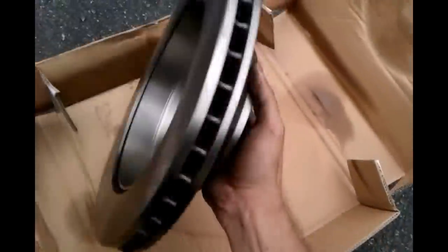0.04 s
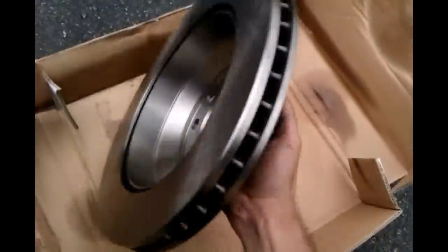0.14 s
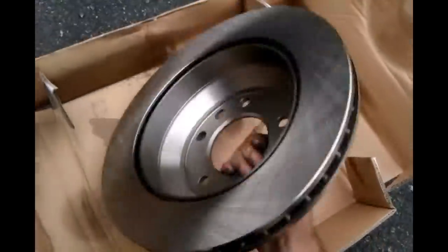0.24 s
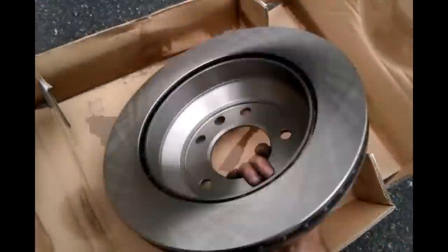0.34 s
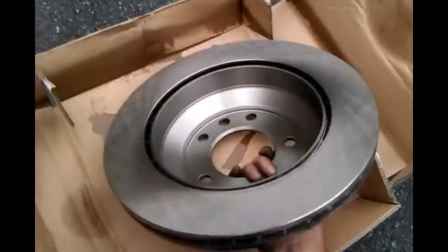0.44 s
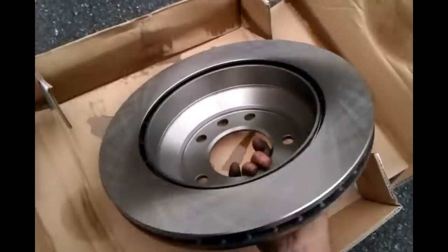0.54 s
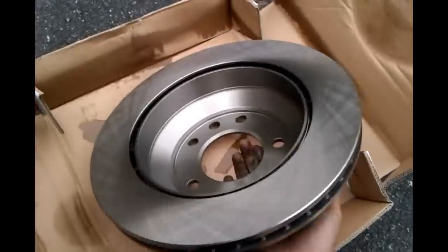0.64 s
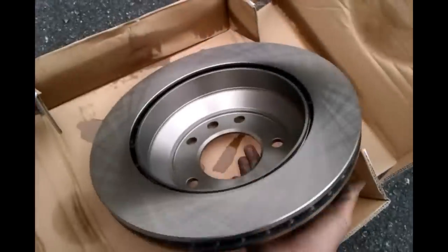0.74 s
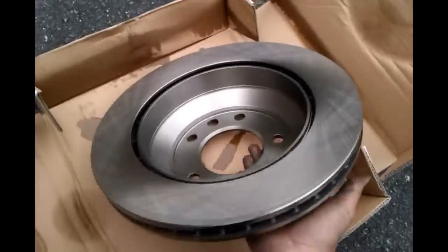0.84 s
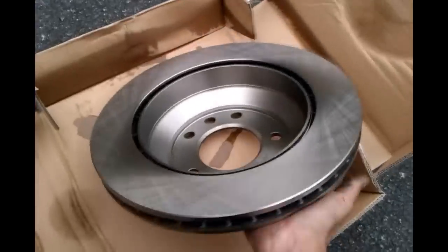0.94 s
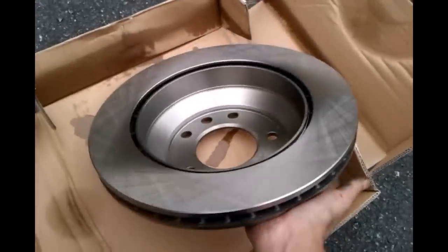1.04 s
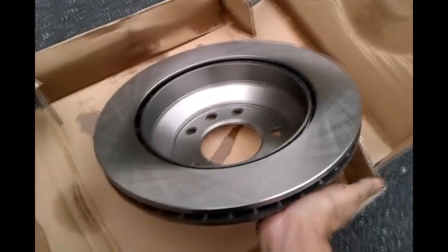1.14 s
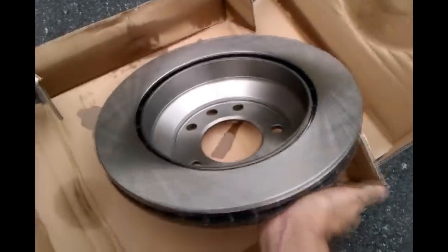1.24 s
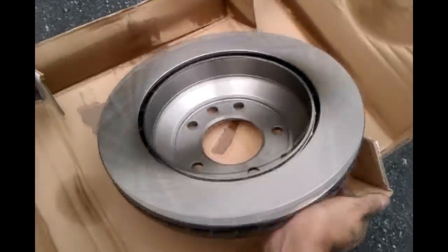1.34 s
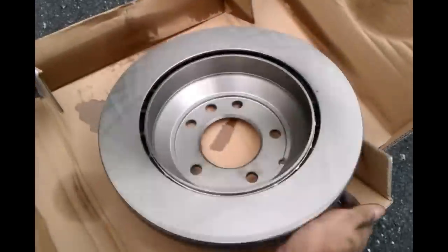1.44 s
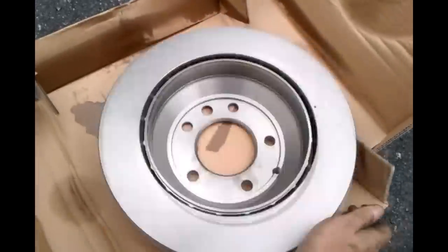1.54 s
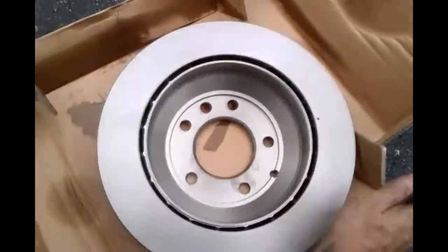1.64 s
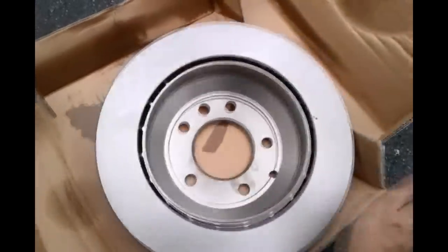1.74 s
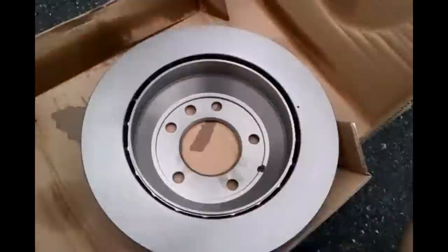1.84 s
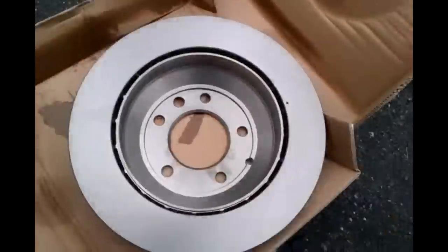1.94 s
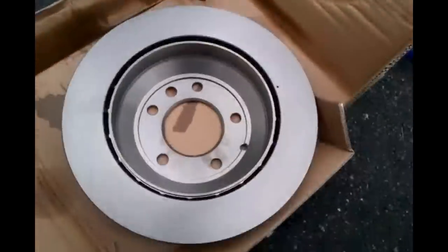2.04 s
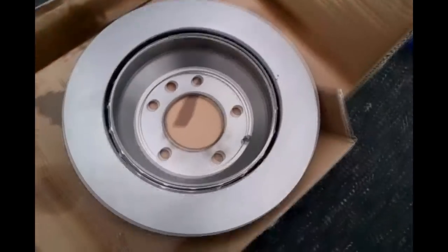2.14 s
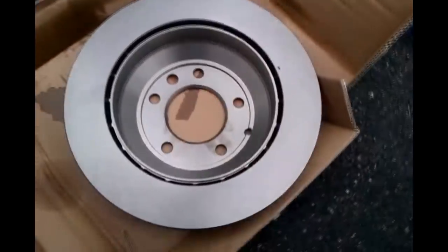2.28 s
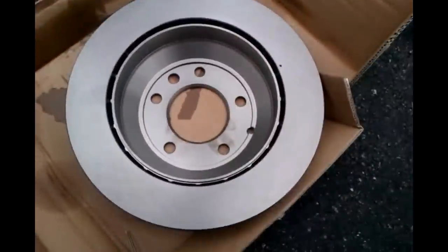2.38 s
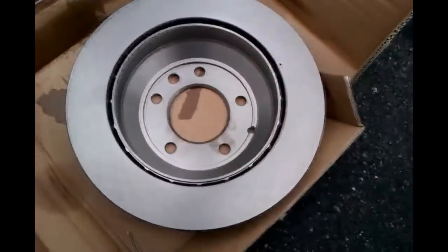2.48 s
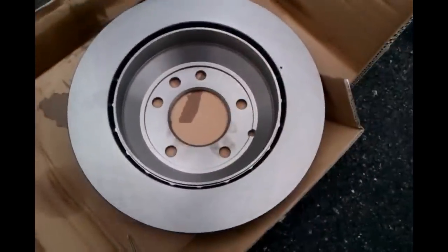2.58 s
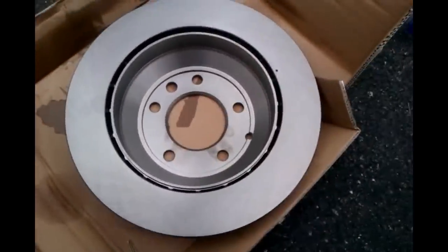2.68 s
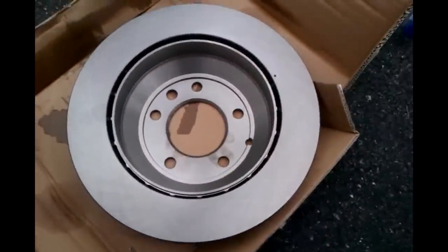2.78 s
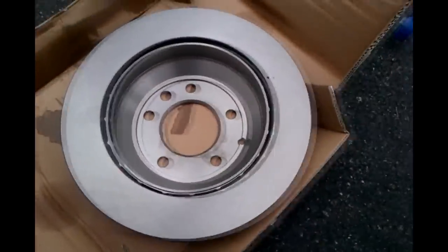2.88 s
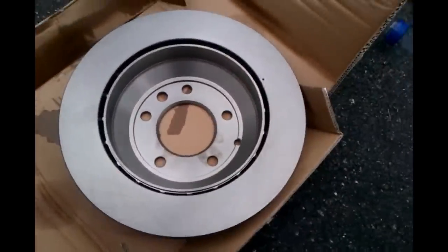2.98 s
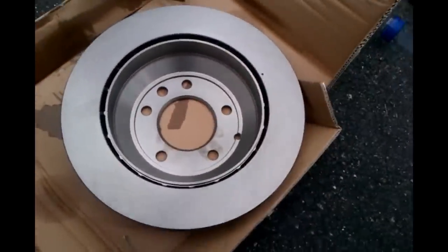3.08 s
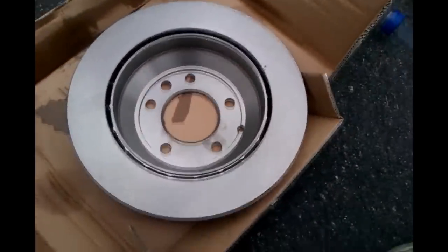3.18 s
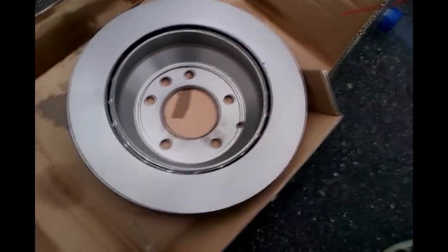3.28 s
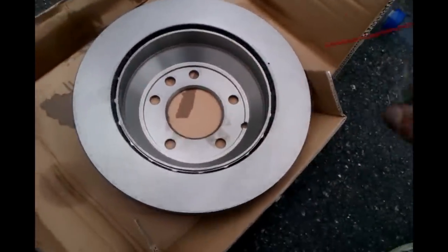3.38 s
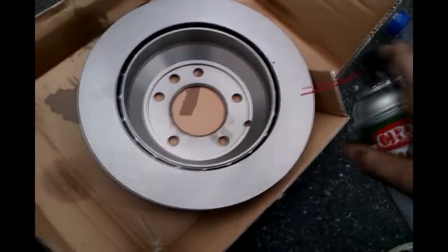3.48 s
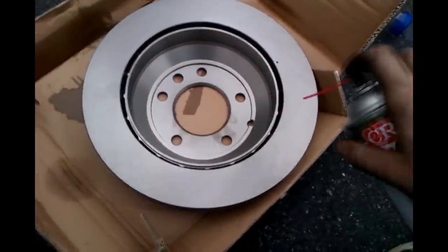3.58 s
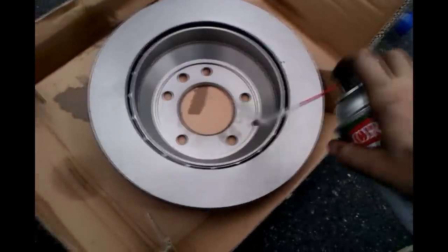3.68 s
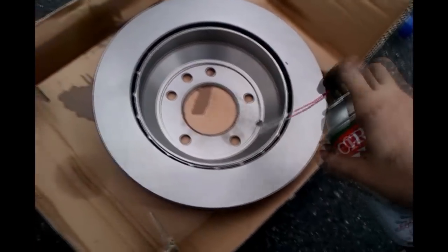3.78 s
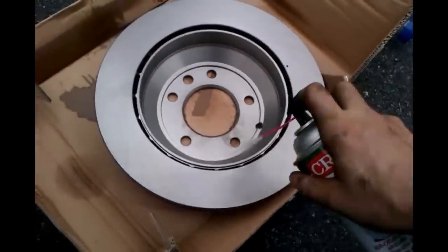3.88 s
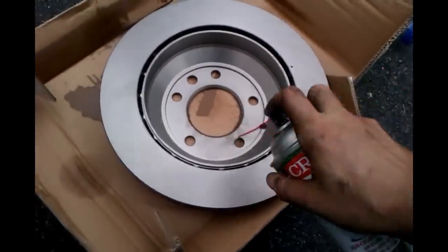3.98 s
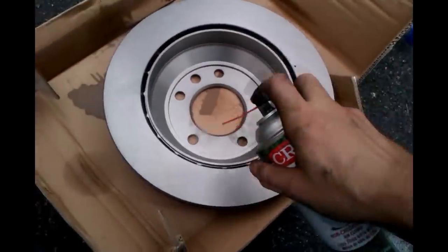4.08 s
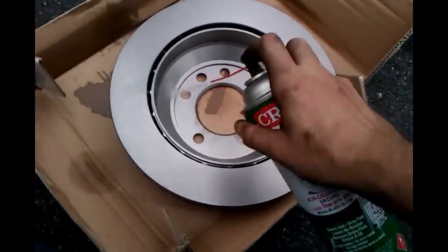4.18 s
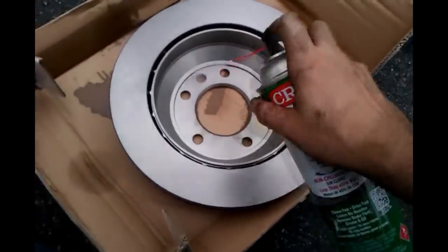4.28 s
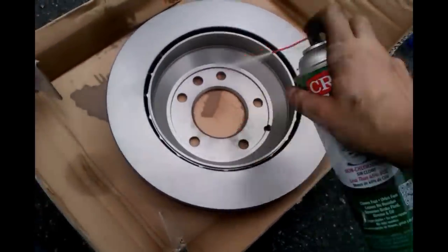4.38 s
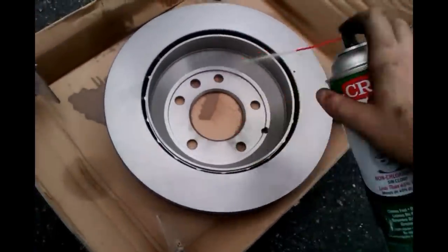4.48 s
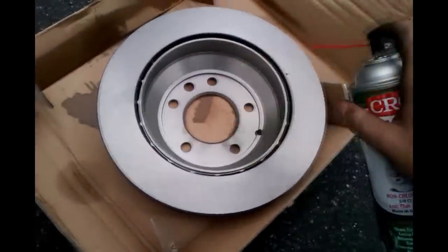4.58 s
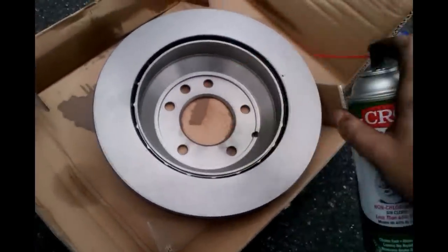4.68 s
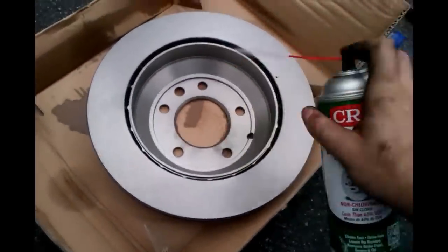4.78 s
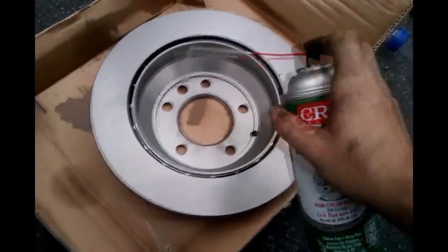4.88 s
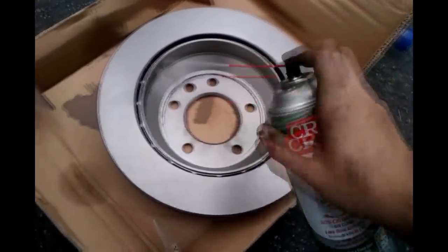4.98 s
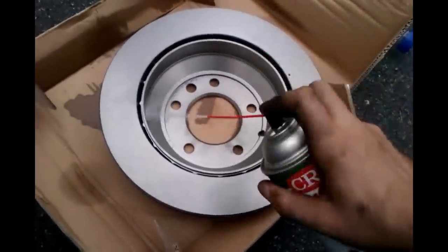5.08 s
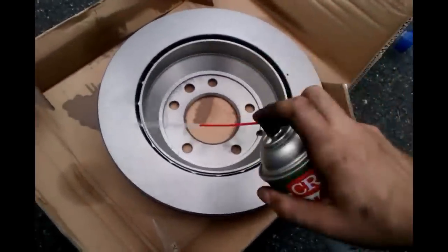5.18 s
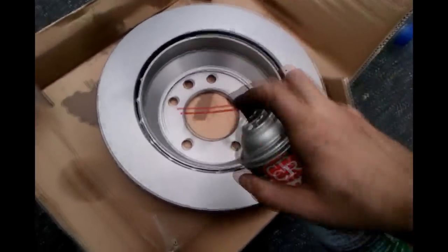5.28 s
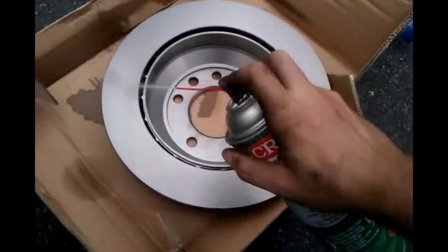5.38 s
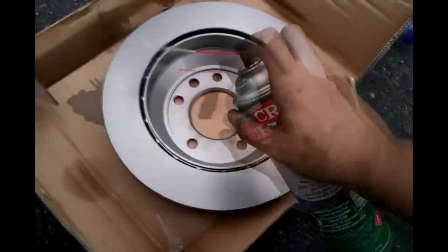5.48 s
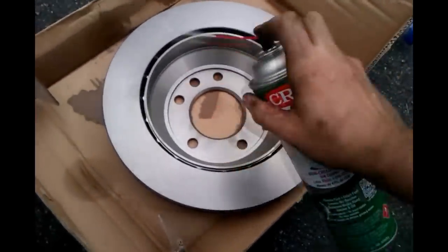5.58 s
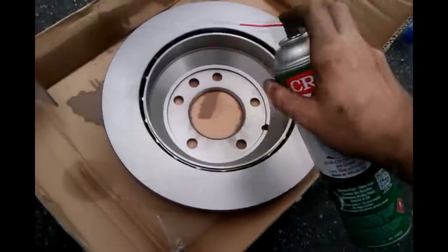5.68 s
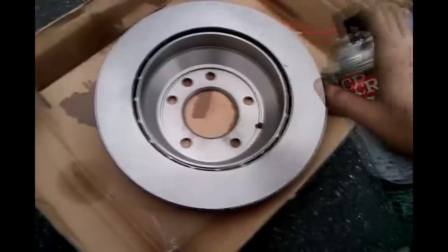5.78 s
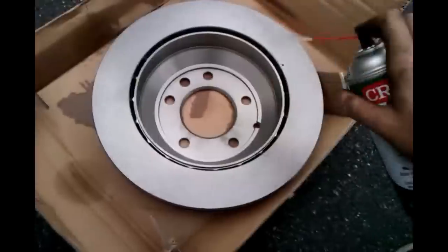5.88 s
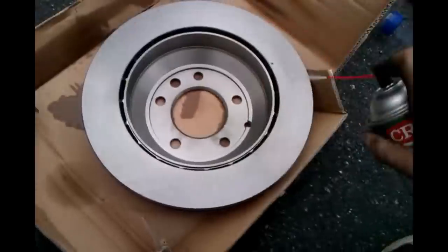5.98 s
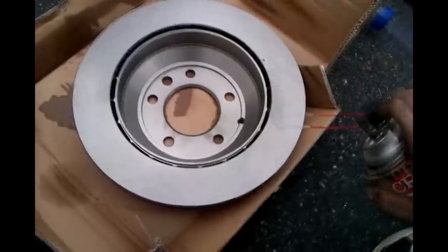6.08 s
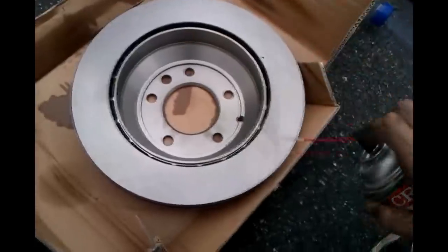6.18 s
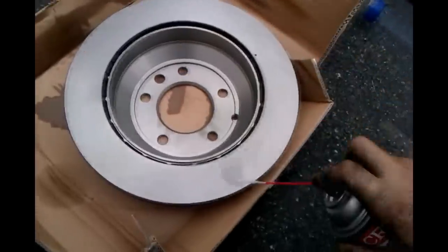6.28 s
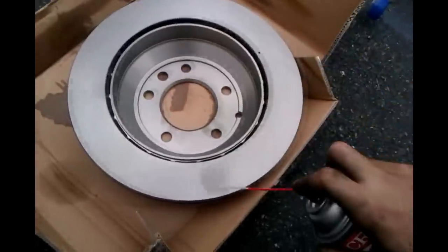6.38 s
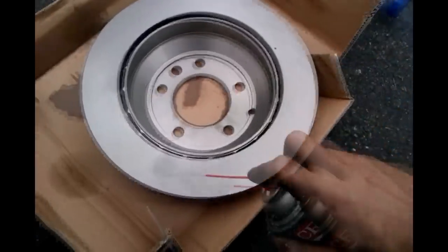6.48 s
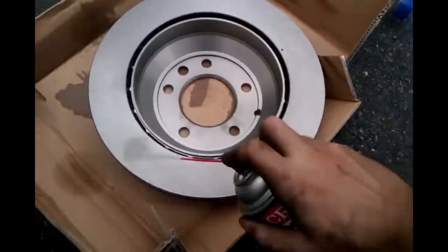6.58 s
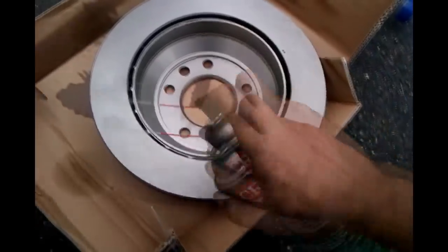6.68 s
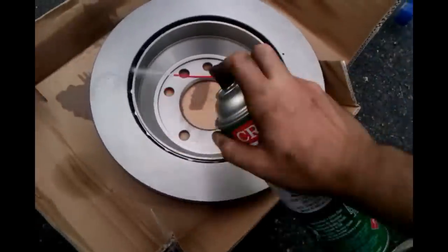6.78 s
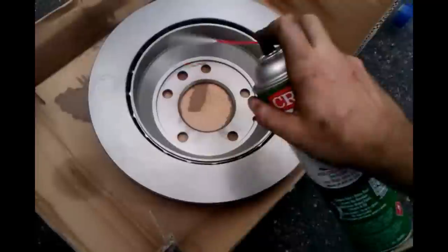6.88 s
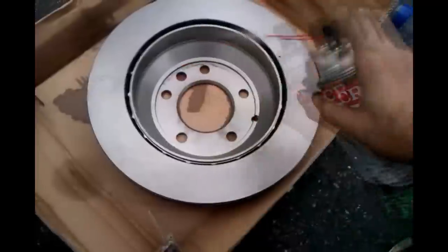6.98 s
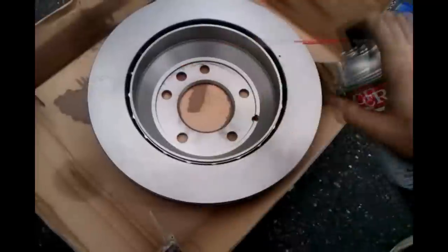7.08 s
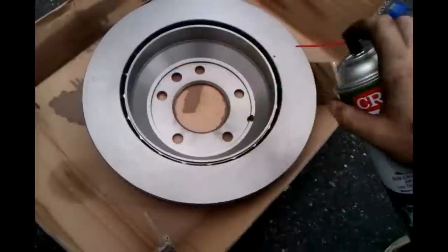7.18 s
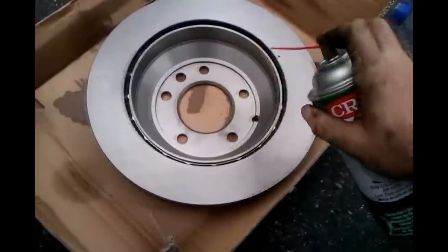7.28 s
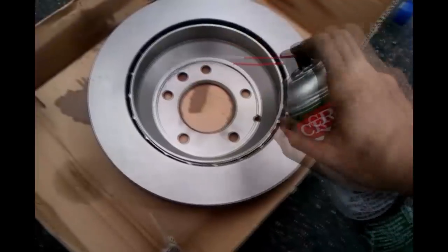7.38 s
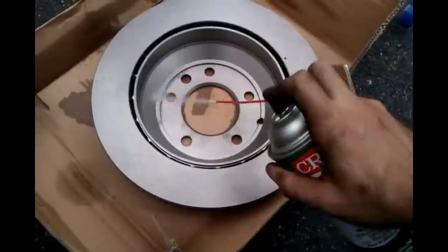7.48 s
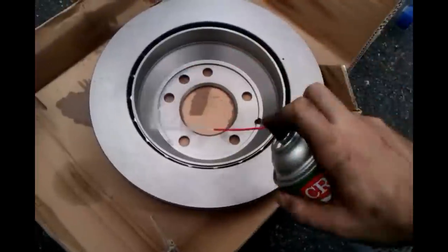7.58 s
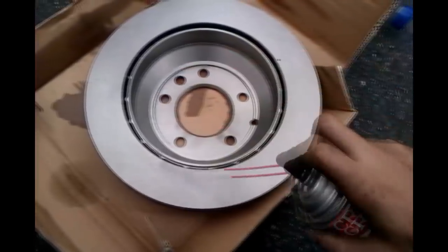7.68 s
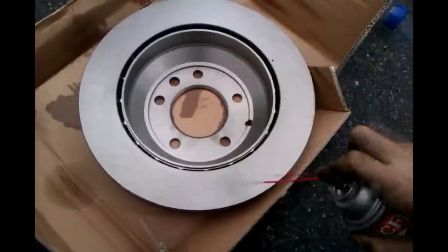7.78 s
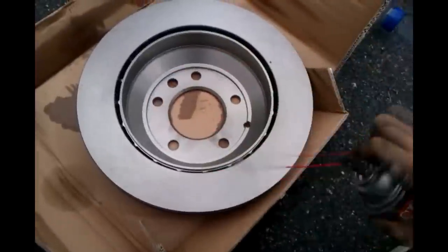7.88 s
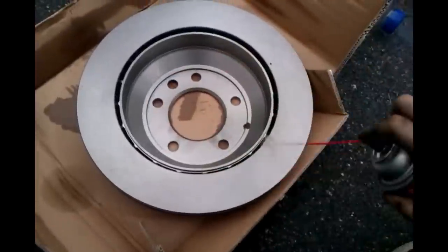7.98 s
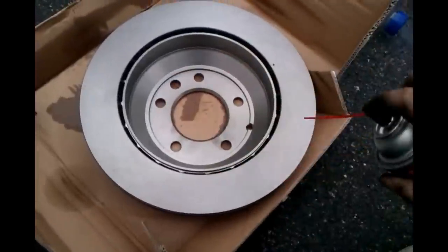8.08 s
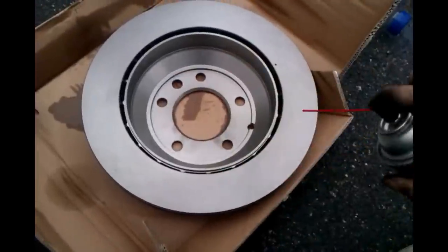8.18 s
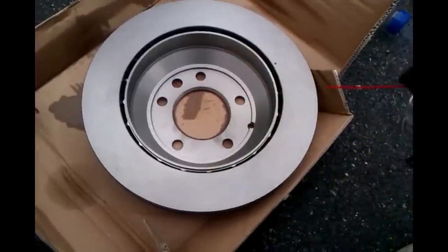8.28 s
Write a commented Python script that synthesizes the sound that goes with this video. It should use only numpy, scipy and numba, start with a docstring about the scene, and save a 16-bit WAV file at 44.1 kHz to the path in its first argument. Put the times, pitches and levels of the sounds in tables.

```python
"""An aerosol can sprays an iron brake disc through a straw in long bursts: droplet clicks, coloured and ringing,
roar in the hollow hub, edge rush and hiss, levels set per stretch as the jet passes over rim, face and hub.
Before that the disc is tipped over and settles, rocking, in a cardboard box: noise bursts, ringing modes, rasps.
Behind: a cricket of arched whistles, far traffic of filtered noise, an engine and a hum of sines.
One microphone outdoors, overloading on the hardest knocks."""
import sys
import numpy as np
from scipy import signal
from scipy.fft import rfft, irfft
from scipy.io import wavfile
from scipy.ndimage import uniform_filter1d
from numba import njit

SR = 44100
rng = np.random.default_rng(int(sys.argv[2]) if len(sys.argv) > 2 else 0)


def digitize_waveform(pressure):
    """Quantize a signal to 16-bit integers and store it at the path in sys.argv[1].

    Rows of a 2-D input are taken as channels; values are limited to [-1, 1].
    """
    field = np.atleast_2d(pressure).T
    bounded = np.clip(field, -1, 1)
    quanta = np.round(bounded * 32767).astype(np.int16)
    wavfile.write(sys.argv[1], SR, quanta)


N = 367794


def from_db(db):
    """Decibels to gain."""
    return 10 ** (np.asarray(db) / 20)


def rms_one(x):
    """Scale to rms 1."""
    return x / np.sqrt(np.mean(x ** 2) + 1e-20)


def in_time(rows, **ends):
    """Each column of a table as a signal, straight lines between rows."""
    s, *columns = np.transpose(sorted(map(tuple, rows)))
    now = np.arange(N) / SR
    return [np.interp(now, s, column, **ends) for column in columns]


def drift(rate_hz):
    """Slow random curve, about rate_hz changes a second; rms 1."""
    r = np.exp(-80 * np.pi * rate_hz / SR)   # one step per 40 samples
    white = rng.standard_normal(N // 40 + 2002)
    slow = signal.lfilter([1], [1, -2 * r, r * r], white)[2000:]
    return np.interp(np.arange(N) / 40, np.arange(len(slow)), rms_one(slow))


def colour(x, spectrum):
    """Minimum-phase filter that follows a table of (Hz, dB); unit power gain."""
    hz, db = np.transpose(spectrum)
    grid_hz = np.fft.rfftfreq(4096, 1 / SR)
    gain = from_db(np.interp(np.log(grid_hz + 1), np.log(hz), db))
    cepstrum = irfft(np.log(gain))
    cepstrum[1:2048] *= 2   # fold to causal
    cepstrum[2049:] = 0
    kernel = irfft(np.exp(rfft(cepstrum)))
    return signal.oaconvolve(x, kernel / np.sqrt(np.sum(kernel ** 2)))[:N]


def resonate(x, hz, width_hz):
    """Two-pole resonance, gain 1 on top."""
    r = np.exp(-np.pi * width_hz / SR)
    zeros = np.array([1, 0, -1]) * (1 - r * r) / 2
    return signal.lfilter(zeros, [1, -2 * r * np.cos(2 * np.pi * hz / SR), r * r], x)


@njit
def gliding(x, radius, angle):
    """Two-pole resonance whose centre moves sample by sample; gain not normalised."""
    y = np.zeros(len(x))
    for i in range(2, len(x)):
        y[i] = x[i] - x[i - 2] + 2 * radius * np.cos(angle[i]) * y[i - 1] - radius * radius * y[i - 2]
    return y


def band(x, low_hz, high_hz):
    """Butterworth band-pass."""
    return signal.sosfilt(signal.butter(2, [low_hz, high_hz], "band", fs=SR, output="sos"), x)


def grains(per_s, spread_db):
    """Random clicks of uneven size; rms 1."""
    sizes = from_db(spread_db * np.minimum(rng.exponential(1, N), 5)) * rng.choice([-1, 1], N)
    return rms_one(sizes * (rng.random(N) < per_s / SR))


# Presses of the valve, one table each, one row per stretch of the spray: a dribble, a puff, a dip
# or a pass over a surface. Each row: start in seconds, splash at the start in dB,
# splash at the end in dB, hub roar in dB, edge rush in dB,
# change of roar and rush across the stretch in dB, splash resonance in Hz,
# lag of the echo off the nearby iron in ms, echo strength from -1 to 1.
PRESSES = [
    [(3.7, -41, -36, -50, -50, 7, 4610, 0.38, 0.11), (3.729, -20, -20.5, -37, -30.5, 5, 5000, 0.6, 0.26),
     (3.805, -24, -24.5, -36.5, -32, -9.5, 5360, 0.7, 0.016),
     (3.953, -24.5, -22.5, -25, -26, -14, 5440, 0.65, 0.24),
     (4.23, -22.5, -20.5, -41.5, -40, 9.5, 5740, 0.57, -0.11),
     (4.36, -19.5, -21, -28.5, -26, -16, 5350, 0.43, -.35)],
    [(4.792, -22, -24.5, -32, -33.5, 2.5, 5270, 0.38, -0.18),
     (4.852, -22.5, -21, -28, -26, -10.5, 5470, 0.66, 0.13),
     (5.185, -31, -22.5, -38.5, -33, 6, 5860, 0.66, -0.18)],
    [(5.393, -23, -29, -46, -33.5, -2, 5700, 0.6, 0.46), (5.404, -18.5, -25, -40, -33, -6, 5700, .68, 0.37),
     (5.422, -30, -30.5, -39.5, -42, -1.5, 5700, 0.76, 0.3),
     (5.523, -19, -29, -31.5, -30.5, -4, 5800, 0.72, 0.11),
     (5.559, -23, -24, -40, -34, -7, 6000, 0.79, 0.26),
     (5.598, -31, -28, -39.5, -39.5, -0.5, 5550, 0.45, -0.0048),
     (5.918, -22.5, -26, -32, -33, -4, 5350, 0.49, 0.26),
     (6.045, -19.5, -20, -32.5, -32.5, -2.5, 5200, 0.51, 0.44),
     (6.2, -18.5, -24, -32, -25.5, -13.5, 4960, 0.37, 0.13),
     (6.445, -27.5, -29, -45.5, -42.5, 0.5, 5690, 0.24, 0.32),
     (6.677, -18, -27, -33.5, -35, -3, 5430, 0.37, -0.17),
     (6.72, -22.5, -20.5, -34, -33, -6, 4460, 0.492, 0.51), (6.797, -27, -33, -44, -42, 4, 5640, .47, 0.25),
     (6.84, -25, -19.5, -30.5, -30, 5, 5670, 0.47, 0.48),
     (6.93, -20.5, -26.5, -27.5, -31, -2, 5360, 1, 0.34),
     (7.11, -28.5, -23, -26, -31.5, 4, 5340, 0.43, 0.28)],
    [(7.389, -23.5, -25, -37, -33, -1, 5170, 1.15, .2),
     (7.43, -23.5, -18, -36.5, -35.5, 2.5, 5320, 1, 0.16),
     (7.62, -19, -22.5, -34, -29.5, 3.5, 5470, 0.5, 0.088),
     (7.9, -24, -19, -34.5, -30.5, 2, 5370, 0.44, 0.25),
     (8.005, -21.5, -15.5, -32.5, -32, 1, 5430, 0.4, 0.5)],
]
# The finger lets go. Each row: time in seconds, decay of the jet in dB per second.
RELEASES = [(4.565, 433), (5.252, 996), (7.158, 1200), (8.105, 817)]
OPENING_DB_PER_S = 3000
LEAK_DB, LEAK_DB_PER_S = -14, 600   # the valve leaks a little just before it opens


def jet():
    """The valve opens and shuts; between, each stretch has its own levels, drifting across it."""
    now = np.arange(N) / SR
    shuts, decay_db_per_s = np.transpose(RELEASES)
    opens = np.array([rows[0][0] for rows in PRESSES])
    press = np.searchsorted((shuts[:-1] + opens[1:]) / 2, now)
    held = np.clip(now, opens[press], shuts[press])
    early = np.maximum(held - now, 0)
    late = np.maximum(now - held, 0)
    valve_db = np.maximum(-OPENING_DB_PER_S * early, LEAK_DB - LEAK_DB_PER_S * early)
    valve_db = valve_db - decay_db_per_s[press] * late

    table = np.vstack(PRESSES)
    row = np.searchsorted(table[:, 0], held, side="right") - 1
    start, first_db, last_db, hub_db, rush_db, change_db, splash_hz, lag_ms, strength = table[row].T
    end = np.minimum(np.append(table[1:, 0], np.inf)[row], shuts[press])
    across = (held - start) / (end - start)
    levels_db = [first_db + (last_db - first_db) * across,
                 hub_db + change_db * across,
                 rush_db + change_db * across]
    levels_db = uniform_filter1d(valve_db + levels_db, size=110, axis=1)
    return *levels_db, uniform_filter1d(splash_hz, size=700), lag_ms, strength


# Droplet spectrum. Each row: frequency in Hz, relative density in dB per Hz.
SPLASH = [(1940, -19.5), (3300, -1), (4320, 0.5), (5460, 2), (6710, -1), (9000, -11), (11700, -21),
          (19800, -120)]
# Straw hiss spectrum. Each row: frequency in Hz, relative density in dB per Hz.
STRAW = [(4710, -39), (8000, -4.5), (10300, -4.5), (15100, -2)]
# Air in the hollow hub. Each row: frequency in Hz, width in Hz, relative level in dB.
HUB_MODES = [(692, 190, -0.5), (1110, 710, -4), (299, 240, -7.5)]
# A narrow dark band in the spray, drifting in pitch and depth.
# Each row: time in seconds, centre in Hz, depth from 0 to 1.
DIP = [(3.75, 3300, 0.8), (4.3, 4000, 0.3), (6.12, 3850, 0.4), (8.08, 3690, 0.6)]
DIP_WIDTH_HZ = 180
STRAW_DB, STRAW_FOLLOWS = -18.5, 0.7   # level at 0 dB splash; dB gained per dB of splash
WALL_ECHO_MS, WALL_ECHO_STRENGTH = 1.087, 0.29   # second echo, off the hub wall; mean lag


def add_echo(x, lag_ms, strength):
    """Add one delayed copy; the lag may move."""
    lag = lag_ms * SR / 1000
    return x + strength * np.interp(np.arange(N) - lag, np.arange(N), x)


def spray():
    """Droplets beat on the iron, air roars in the hub and rushes over edges, gas hisses from the straw."""
    splash_db, hub_db, rush_db, splash_hz, lag_ms, strength = jet()
    sputter_db = drift(30)
    drops = colour(grains(9700, spread_db=1.5), SPLASH)
    ring_hz = splash_hz * (1 + 0.03 * drift(10))
    ringing = gliding(drops, np.exp(-np.pi * 500 / SR), 2 * np.pi * ring_hz / SR)
    splash = drops + from_db(-4.5) * rms_one(ringing)

    white = rng.standard_normal((3, N))
    hub = np.zeros(N)
    for k, (hz, width_hz, db) in enumerate(HUB_MODES):
        hub += (-1) ** k * from_db(db) * resonate(white[0], hz, width_hz)
    rush = rms_one(band(white[1], 1780, 3650))

    near = from_db(splash_db) * rms_one(splash)
    near = near + from_db(rush_db + 0.63 * drift(20)) * rush
    # the trembling hand makes the notches wander
    near = add_echo(near, lag_ms * (1 + 0.038 * drift(8.6)), strength)
    near = add_echo(near, WALL_ECHO_MS * (1 + 0.13 * drift(2.18)), WALL_ECHO_STRENGTH)

    dip_hz, depth = in_time(DIP)
    dip_hz = dip_hz * (1 + 0.028 * drift(6.8))
    dark_band = gliding(near, np.exp(-np.pi * DIP_WIDTH_HZ / SR), 2 * np.pi * dip_hz / SR)
    near = near - np.clip(depth, 0, 1) * np.pi * DIP_WIDTH_HZ / SR * dark_band

    straw_db = STRAW_DB + STRAW_FOLLOWS * splash_db
    straw_db = straw_db + np.minimum(splash_db + 36, 0)   # dies as the valve shuts
    straw = from_db(straw_db + 3.14 * drift(11.7)) * colour(white[2], STRAW)
    roar = from_db(hub_db + 2.0 * drift(19.6)) * rms_one(hub)
    return from_db(sputter_db) * (near + roar) + straw


# Knocks and creases of the box. Each row: time in seconds, crack strength in dB,
# dull part re crack in dB, box ring re crack in dB.
KNOCKS = [(0.1595, -5, 2.5, -20), (0.1626, 6.5, 0, -20), (0.1897, -16, -14, -16), (0.239, -6.5, -15, -17),
          (0.2446, -7, -14, -30), (.2528, -7.5, -18, -20), (.2965, -19, -15, -30), (0.4193, -9.5, -3, -18),
          (0.432, 1, -3.5, -17), (0.439, -10, 3, -5), (.491, -9.5, -5, -28), (0.5068, 9.5, 1.5, -17),
          (0.5895, -9.5, -9, -23), (0.597, -15, -2, -22), (0.6523, -3, -16, -33), (0.6622, -1.5, -3, -30),
          (0.6723, -3, -6, -23), (0.6783, -7, 0, -31), (.844, -21.5, -7, -6), (1.3367, -15, -5, -15),
          (1.5126, -13.5, -18, -32), (1.676, -13, -2, -18), (1.6825, -7, -1, -21), (1.686, -9.5, 7, -22),
          (1.688, -0.5, -3, -25), (1.6951, -5.5, 5.5, 1), (1.735, -16, -12, -27), (1.7523, -9.5, -1, -9),
          (1.775, -8.5, -6, -27), (1.8289, -16.5, -1, 0), (1.8352, -9, 1, -4), (1.852, -10, -15, -25),
          (1.9282, -17, -16, -33), (1.949, -11, -10, -28), (1.957, -2.5, -14, -14),
          (2.047, -6.5, -15, -7.5), (2.3397, -16, -14, -27), (3.2897, -25, -10, -27),
          (3.307, -20.5, -13, -19), (3.403, -25, -10, -28), (4.649, -27, -12, -28)]
# Crack spectrum. Each row: frequency in Hz, relative density in dB per Hz.
CRACK = [(120, -48), (880, 0), (1500, -4), (2660, -9), (5620, -0.5), (7340, -19), (12400, -41),
         (15800, -57)]
# Box walls. Each row: frequency in Hz, relative level in dB, t60 in seconds.
BOX_MODES = [(547, 2.5, 0.003), (807, 7.5, 0.0066), (1075, 2, 0.03), (1313, -5.5, 0.048)]
# Ringing bumps of the disc against the box. Each row: time in seconds, starting level in dB,
# pitch in Hz, t60 in seconds.
BUMPS = [(.4102, -10.5, 970, .012), (0.51, 4.5, 2670, 0.0083), (1.684, -7.5, 550, 0.021),
         (1.6949, -9, 516, 0.018), (1.696, -4.5, 735, 0.04), (1.831, -9, 680, 0.025),
         (3.0364, -20, 940, 0.014), (3.0349, -22, 1946, 0.0085), (3.0353, -15, 3450, 0.005)]
# The weight of the disc lands. Each row: time in seconds, strength in dB.
THUDS = [(0.1655, 0.5), (1.834, -15), (2.046, -21)]
# Floor of the box. Each row: frequency in Hz, relative level in dB, t60 in seconds.
THUD_MODES = [(152, -15, 0.1), (235, -0.5, 0.02), (314, -14.5, 0.057)]
CRACK_T60_S, CRACK_LENGTHENS = 0.03, 0.15   # t60 of a 0 dB crack; power of strength by which it lengthens
CRACK_RISE_S = 0.00087
TICK_DB, TICK_T60_S = 4, 0.008   # sharp tick at the start, re a 0 dB crack
TICK_GROWS = 0.5   # extra dB of tick re crack per dB of strength
CRACK_CREST_DB = 8   # allowance for noise peaks above the envelope
DULL_BELOW_HZ, WALLS_ABOVE_HZ = 1900, 290   # top of the dull part; the walls radiate no bass


def strike(modes, at, db):
    """Each blow sets every mode ringing with a strength of its own."""
    out = np.zeros(N)
    scatters = rng.standard_normal((len(at), len(modes))).T
    for (hz, mode_db, t60_s), scatter in zip(modes, scatters):
        clicks = np.full(N, 1e-18)
        clicks[at] = from_db(db + mode_db + 2.0 * scatter)
        r, w = from_db(-60 / (t60_s * SR)), 2 * np.pi * hz / SR
        out += signal.lfilter([0, np.sin(w)], [1, -2 * r * np.cos(w), r * r], clicks)
    return out


def knocks():
    """A dying burst of noise where fibres crack, the ring of the box walls, thuds and bumps."""
    s, crack_db, dull_db, ring_db = np.transpose(KNOCKS)
    at = np.round(s * SR).astype(int)
    age = np.arange(3000) / SR
    envelopes = np.zeros((2, N))   # bright, dull
    for i, db, dull_re_db in zip(at, crack_db, dull_db):
        t60_s = CRACK_T60_S * from_db(CRACK_LENGTHENS * db)
        crack = from_db(db - 3.0 - 60 * age / t60_s) * np.minimum(age / CRACK_RISE_S, 1)
        tick = from_db(db + TICK_DB + TICK_GROWS * db - 60 * age / TICK_T60_S)
        gains = from_db([[-CRACK_CREST_DB], [dull_re_db - CRACK_CREST_DB]])
        envelopes[:, i:i + len(age)] += gains * (crack + tick)
    bright, dull = envelopes * rng.choice([-1, 1], (2, N))
    burst = band(bright, DULL_BELOW_HZ, 22000) + band(dull, 100, DULL_BELOW_HZ)
    walls = colour(burst, CRACK) + strike(BOX_MODES, at, crack_db + ring_db - 7.5)
    for start, db, hz, t60_s in BUMPS:
        i = round(start * SR)
        walls[i:i + len(age)] += from_db(db - 60 * age / t60_s) * np.sin(2 * np.pi * hz * age)
    s, thud_db = np.transpose(THUDS)
    thuds = strike(THUD_MODES, np.round(s * SR).astype(int), thud_db)
    return band(walls, WALLS_ABOVE_HZ, 21000) + thuds


# Disc and hand scuffing the cardboard. Each row: start in seconds, end in seconds,
# start level in dB, end level in dB.
SCUFFS = [(0.15, 0.226, -22.5, -46), (0.229, 0.31, -33, -51), (0.337, 0.407, -43, -37.5),
          (0.416, 0.476, -22, -42), (0.484, 0.539, -31, -28), (0.55, 0.646, -42, -26.5),
          (0.651, 0.708, -25, -43.5), (0.705, .87, -40, -48.5), (1.543, 1.704, -48, -28.5),
          (1.709, 1.817, -26, -48), (1.816, 1.903, -30.5, -37), (1.908, 1.963, -42, -25),
          (1.971, 2.025, -32, -33), (2.041, 2.101, -26, -45), (2.124, 2.164, -36, -31),
          (2.205, 2.25, -38, -37.5), (2.287, 2.322, -36.5, -48), (2.607, 2.952, -50.5, -43.5)]
# A finger dragged across the ribs of the board catches on each. Each row: start in seconds,
# end in seconds, strength in dB.
DRAG = [(1.364, 1.395, -22.5), (1.392, 1.415, -21.5), (1.416, 1.434, -23), (1.433, 1.469, -29),
        (1.465, 1.479, -27.5), (1.481, 1.502, -27.5), (1.498, 1.51, -15), (1.515, 1.531, -30),
        (1.545, 1.554, -34)]
# Bands in which the drag sounds. Each row: centre in Hz, width in Hz, relative level in dB.
DRAG_RINGS = [(4330, 320, 3.5), (5450, 400, -3), (2850, 500, -2)]
# Rasp spectrum. Each row: frequency in Hz, relative density in dB per Hz.
RASP = [(1290, -28), (2200, 4), (2820, 0), (3680, 0), (4500, 5), (5410, 5), (10000, -16.5), (13000, -60)]
SCUFF_BODY_DB, DRAG_BODY_DB = -7.5, -22   # drive of the box walls re scuff and drag envelopes


def rubbing():
    """Clumped slips on the corrugated board: a bright rasp, and the box walls sounding along."""
    rasp, drag = np.zeros((2, N))
    for start, end, start_db, end_db in SCUFFS:
        i, j = round(start * SR), round(end * SR)
        rasp[i:j] += from_db(np.linspace(start_db, end_db, j - i))
    for start, end, db in DRAG:
        i, j = round(start * SR), round(end * SR)
        drag[i:j] += from_db(db) * np.abs(np.sin(np.linspace(0, np.pi, j - i))) ** 0.58
    rasp = uniform_filter1d(rasp, size=440)
    boom = from_db(SCUFF_BODY_DB) * rasp + from_db(DRAG_BODY_DB) * drag

    slips = grains(4000, spread_db=2.5) * from_db(2.2 * drift(60))
    rasp, drag, boom = rasp * slips, drag * slips, boom * slips
    ringing = from_db(-12.5) * drag
    for hz, width_hz, db in DRAG_RINGS:
        angle = 2 * np.pi * hz * (1 + 0.031 * drift(25)) / SR
        ring = gliding(drag, np.exp(-np.pi * width_hz / SR), angle)
        ringing = ringing + from_db(db) * np.pi * width_hz / SR * ring
    walls = sum(from_db(db) * resonate(boom, hz, 200) for hz, db, _ in BOX_MODES)
    return colour(rasp + ringing, RASP) + from_db(11) * walls


# Trills. Each row: first stroke in seconds, number of strokes, seconds between strokes.
TRILLS = [(0.003, 4, 0.063), (1.039, 6, 0.0598), (1.409, 15, 0.065), (2.383, 42, 0.0641),
          (5.075, 52, 0.0639)]
# One wing stroke. Each row: time in seconds, pitch in Hz, relative level in dB.
STROKE = [(-.013, 6700, -14), (-.008, 7000, -6.5), (.001, 7300, 0), (.008, 7260, -3.5), (0.016, 6940, -9)]
CRICKET_DB = -46.5   # mean stroke level


def cricket():
    """Each wing stroke is a short whistle that arches up and down in pitch."""
    s, hz, db = np.transpose(STROKE)
    age = np.arange(s[0], s[-1], 1 / SR)
    phase = 2 * np.pi * np.cumsum(np.interp(age, s, hz)) / SR
    whistle = from_db(np.interp(age, s, db)) * np.sin(phase)
    margin = 2000   # samples of room at each end
    out = np.zeros(N + 2 * margin)
    for first, strokes, period_s in TRILLS:
        for t in first + period_s * np.arange(strokes):
            i = int((t + s[0]) * SR) + margin
            out[i:i + len(age)] += whistle * from_db(CRICKET_DB + rng.normal(0, 0.66))
    # random flutter stands for echoes off the ground
    return out[margin:N + margin] * from_db(2.0 * drift(150))


# Far traffic. Each row: time in seconds, deep rumble in dB, drone in dB, tyre roar in dB.
TRAFFIC = [(0.0, -38.5, -39, -40), (1.18, -45.5, -43, -42), (1.72, -39, -45.5, -43.5),
           (1.92, -41.5, -39.5, -39.5), (2.79, -43.5, -47.5, -44.5), (5.32, -45.5, -45.5, -42.5),
           (8.22, -40.5, -35, -38.5)]
# Rumble spectrum. Each row: frequency in Hz, relative density in dB per Hz.
RUMBLE = [(15, -77), (25, -1.5), (113, 1.5), (170, 0.5), (220, -15.5), (370, -120)]
# Tyre roar spectrum. Each row: frequency in Hz, relative density in dB per Hz.
ROAR = [(250, -42), (413, -3), (908, 2.5), (1700, -5.5), (4150, -13.5), (5400, -9), (6660, -19.5),
        (8000, -27.5), (15000, -39)]


def traffic():
    """Swelling rumble, drone and tyre roar, each a band of noise."""
    rumble_db, drone_db, roar_db = in_time(TRAFFIC)
    white = rng.standard_normal((3, N))
    rumble = from_db(rumble_db + drift(4.5)) * colour(white[0], RUMBLE)
    drone = from_db(drone_db + drift(3.8)) * rms_one(band(white[1], 163, 297))
    roar = from_db(roar_db + drift(9.7)) * colour(white[2], ROAR)
    return rumble + drone + roar


# Far engine, dropping to idle. Each row: time in seconds, firing rate in Hz, level in dB rms.
ENGINE = [(0.0, 67, -38.5), (1.22, 68.3, -49.5), (1.66, 48.2, -39.5), (2.6, 48.74, -45.5),
          (3.5, 46.45, -48.5), (4.33, 45.07, -50), (6.4, 48, -52.5)]
# Engine orders. Each row: multiple of the firing rate, relative level in dB.
ORDERS = [(2, -7), (3, 0), (4, -0.5)]
ENGINE_IDLE_HZ, EVEN_LOSS_DB_PER_HZ = 48, 2.5   # above idle the even orders weaken
FOURTH_FADES_HZ, FOURTH_LOSS_DB_PER_HZ = 47.5, 3   # below this rate the fourth order fades


def engine():
    """Low orders of one engine, sines locked to its firing rate."""
    firing_hz = in_time(ENGINE)[0]
    engine_db = in_time(ENGINE, right=-120)[1]
    turn = 2 * np.pi * np.cumsum(firing_hz) / SR
    even_loss_db = EVEN_LOSS_DB_PER_HZ * np.maximum(firing_hz - ENGINE_IDLE_HZ, 0)
    fourth_loss_db = FOURTH_LOSS_DB_PER_HZ * np.maximum(FOURTH_FADES_HZ - firing_hz, 0)
    out = np.zeros(N)
    for k, db in ORDERS:
        order_db = engine_db + db - even_loss_db * (k % 2 == 0) - fourth_loss_db * (k == 4)
        out += from_db(order_db + 2.8 * drift(4.8)) * np.sin(k * turn)
    return np.sqrt(2) * out


# A far machine. Each row: time in seconds, pitch in Hz, level in dB rms.
HUM = [(1.25, 114.4, -68), (1.5, 112.8, -49), (3.2, 113.6, -46.5), (5.2, 115.3, -51), (5.4, 116.3, -70)]


def hum():
    """One sine, wandering in pitch and level."""
    hum_hz = in_time(HUM)[0]
    hum_db = in_time(HUM, left=-120, right=-120)[1]
    tone = np.sin(2 * np.pi * np.cumsum(hum_hz) / SR)
    return np.sqrt(2) * from_db(hum_db + 2.5 * drift(1.2)) * tone


def scene():
    """All sources reach one microphone, heard alike on both sides."""
    mono = spray() + knocks() + rubbing() + cricket() + traffic() + engine() + hum()
    return np.tile(mono, (2, 1))


CLIP_TOP = 0.9   # ceiling of the overload, before the filters
CUTOFF_HZ = 16050


def record(dry):
    """The hardest peaks are squashed flat, the deepest bass is lost, the top of the spectrum is cut."""
    squashed = dry / (1 + (dry / CLIP_TOP) ** 4) ** (1 / 4)
    no_bass = signal.sosfilt(signal.butter(2, 50, "high", fs=SR, output="sos"), squashed)
    return signal.sosfilt(signal.cheby2(16, 70, CUTOFF_HZ, fs=SR, output="sos"), no_bass)


dry = scene()
out = record(dry)
digitize_waveform(out)
```